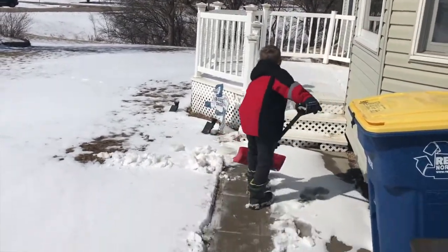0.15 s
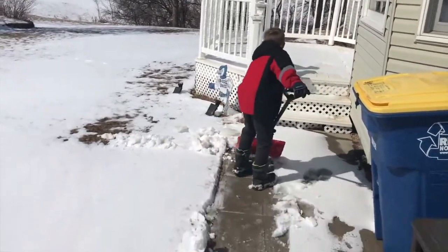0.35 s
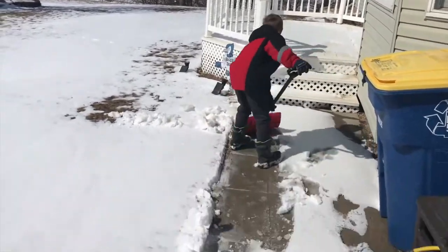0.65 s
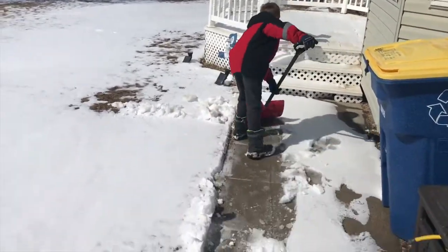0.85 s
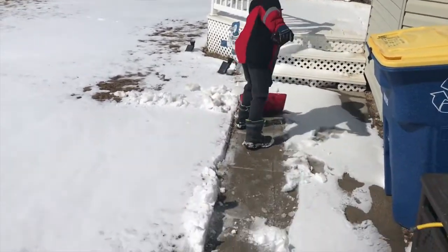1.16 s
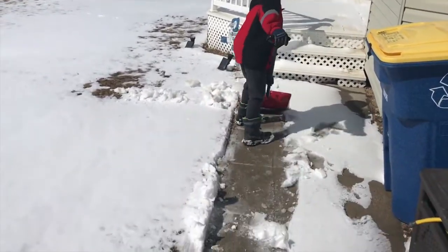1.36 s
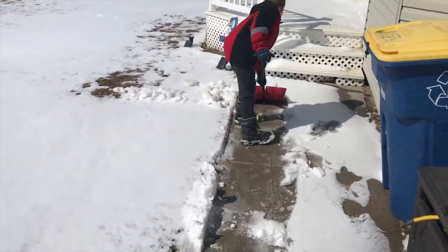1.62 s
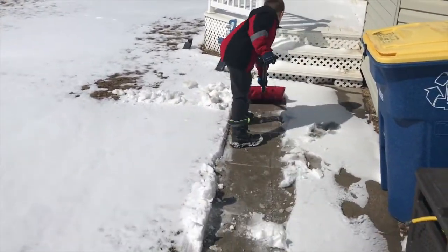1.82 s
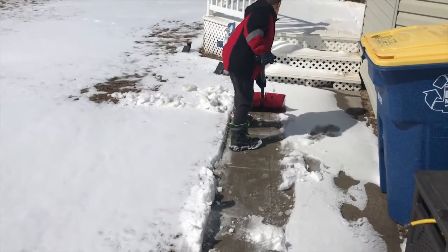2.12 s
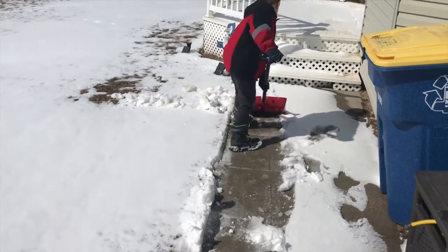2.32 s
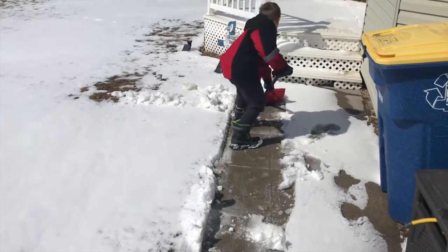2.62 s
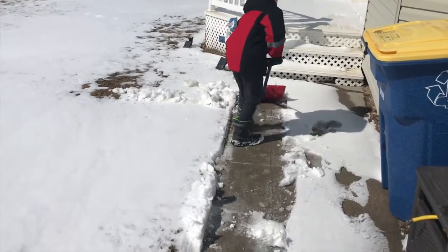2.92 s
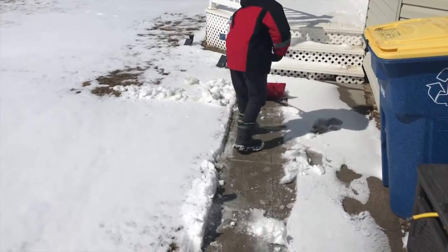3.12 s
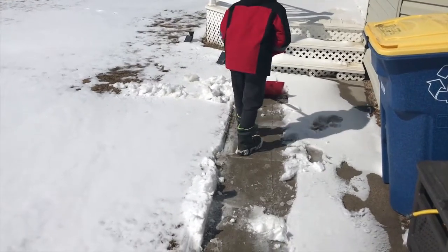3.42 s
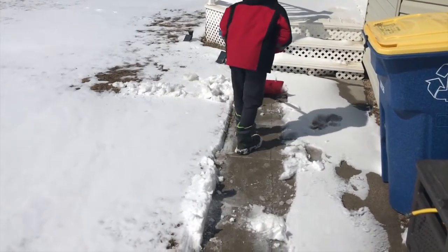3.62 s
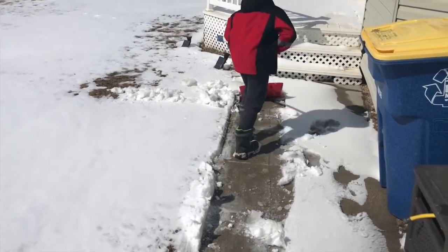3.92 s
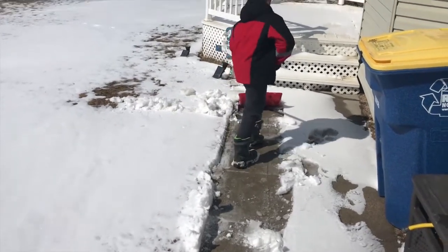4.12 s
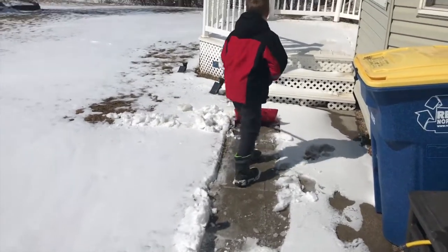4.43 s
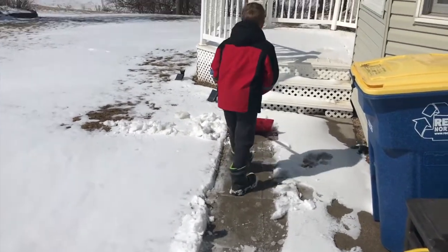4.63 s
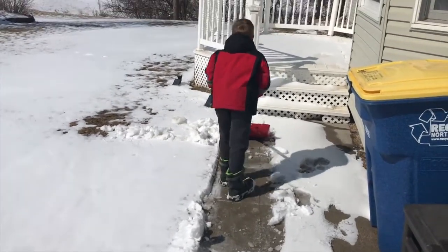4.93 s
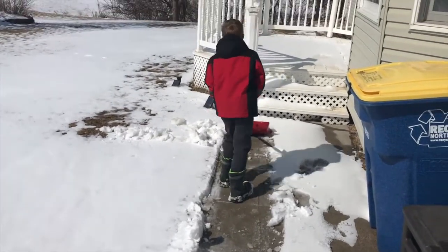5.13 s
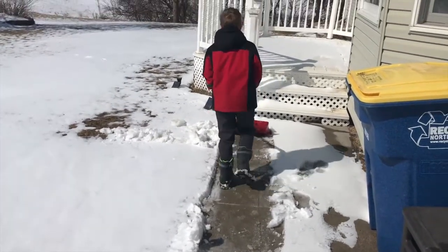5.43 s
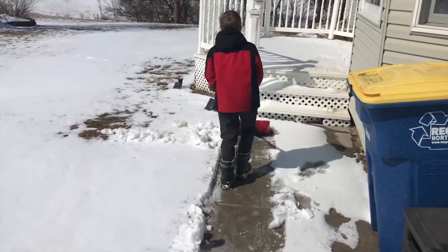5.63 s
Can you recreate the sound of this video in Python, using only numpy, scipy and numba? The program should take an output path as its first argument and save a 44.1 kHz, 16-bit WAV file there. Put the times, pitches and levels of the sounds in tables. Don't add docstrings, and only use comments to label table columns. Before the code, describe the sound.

Gritty, hollow shovel scrapes in bursts over a concrete path, followed by near-quiet with low wind buffeting and a few boot scuffs and clicks.

```python
import sys
import numpy as np
from scipy import signal
from scipy.fft import rfft, irfft
from scipy.io import wavfile
from scipy.ndimage import uniform_filter1d
from numba import njit

SR = 44100
rng = np.random.default_rng(int(sys.argv[2]) if len(sys.argv) > 2 else 0)


def generate_wav(signal):
    frames = np.transpose(np.atleast_2d(signal))
    scaled = np.clip(frames, -1, 1) * 32767
    pcm = np.round(scaled).astype(np.int16)
    wavfile.write(sys.argv[1], SR, pcm)


def gain_from_decibels(decibels):
    exponent = np.asarray(decibels, float) / 20
    return 10 ** exponent


N = 254016

# (frequency [Hz], density [dB per Hz])
GRIT_SPECTRUM = [(1650, -11.5), (2800, 3), (2990, -3), (3500, 1.5), (4100, -5), (4470, -2.5), (4860, -8.5),
                 (5210, -5.5), (6170, -3.5), (7470, -8), (9390, -11), (10300, -16), (13400, -62),
                 (22000, -120)]
# (frequency [Hz], density [dB per Hz])
SPRAY_SPECTRUM = [(6060, -12), (10300, -4), (10800, -6), (12400, -1), (14000, -8), (15800, -7.5)]


def shovel():
    # (time [s], peak [dB], place towards the belly and away from the rim [dB], grit [dB])
    knocks = [(0.526, -30.5, -7, -6), (0.544, -28.5, -4, -7), (0.557, -28.5, 6.5, -8.5),
              (0.608, -34, 11, -1), (0.653, -35, -4, -2), (0.669, -25, -4, -3), (0.704, -24, -6.5, -20),
              (0.780, -45.5, 9, -3.5), (1.114, -39.5, -6, -20), (1.147, -33, 0, -28), (1.163, -32, -5, -18),
              (1.207, -40, 3, 0.5), (1.512, -43, -5, -10), (1.528, -40, -8, -7), (1.559, -34, -6, -9),
              (1.601, -19, 0.5, -1), (1.623, -36, 12, -21), (1.668, -19.5, -4, -10),
              (1.699, -28.5, 8.5, -8), (1.839, -49, 12, -7), (2.114, -35.5, 2, -15), (2.243, -49, 2, -10),
              (2.287, -35, 1, -14), (2.353, -37.5, 2, -1.5), (2.471, -25.5, 8, -22),
              (2.483, -24.5, -9, -18), (2.496, -20.5, 5, -22), (2.519, -28.5, 5, -6),
              (2.549, -26.5, 3.5, -10), (2.579, -35, -8, 7), (2.649, -36, -6, -12)]
    # (frequency [Hz], width [Hz], level [dB])
    belly_modes = [(259.5, 61, -1.5), (347, 55, 4), (412.6, 90, -4)]
    blade_modes = [(560, 73, 3.5), (714, 76, 2.5), (906, 85, 2.5), (995, 70, 3.5), (1144, 30, -0.5)]
    rim_modes = [(1330, 103, 3), (1620, 110, 3), (1880, 160, -1), (2100, 147, 1), (2310, 590, -6.5)]
    # (time [s], level [dB], frequency [Hz], width [Hz])
    chips = [(0.597, -27, 5860, 2500), (0.666, 0, 1140, 200), (0.667, -7, 2150, 300),
             (1.602, -20.5, 4650, 2500), (1.604, -18, 1560, 300), (1.605, -2.5, 960, 200),
             (1.669, -6.5, 696, 200), (1.67, -11, 1030, 200), (2.287, -17, 7000, 1500),
             (2.288, -13, 1030, 129), (2.2865, -7, 1990, 197), (2.287, -5.5, 2980, 200),
             (2.29, -10, 1320, 120), (2.496, -23.5, 6130, 900), (3.6, -54, 6800, 1170),
             (3.6, -51, 10140, 1500), (3.988, -56, 4500, 3000), (4.913, -41, 5500, 1000),
             (5.228, -38, 4500, 900), (0.703, -11, 1150, 300), (0.703, -26.5, 3500, 1500),
             (4.914, -40, 1020, 160), (5.481, -42, 1880, 220), (5.534, -39, 1100, 350)]
    knock_t60_s, knock_boom_db, knock_rim_db = 0.048, -2.5, -5

    blade, belly, rim, grit, spray = pressure()
    lean = gain_from_decibels(0.6 * walk(30))
    forces = [belly * gain_from_decibels(-3.0) * slips(1200, 2.9, 0.87, 45.37),
              blade * gain_from_decibels(-5.5) * lean * slips(2500, 3.2, 1.1, 70),
              rim * gain_from_decibels(-7.0) / lean * slips(4000, 2.5, 1.3, 70),
              grit * gain_from_decibels(-1.1) * slips(4000, 3.5, 1.8, 90),
              spray * gain_from_decibels(-0.9) * slips(10000, 2.7, 1.7, 80)]

    for s, db, place_db, grit_db in knocks:
        parts = [(knock_boom_db + place_db, 0.5, 0.9),
                 (-1.5, 0.5, 0.8),
                 (knock_rim_db - place_db, 0.45, 0.6),
                 (grit_db - 2.5, 0.7, 0.15),
                 (grit_db - 5.5, 0.6, 0.1)]
        for force, (part_db, share, blow) in zip(forces, parts):
            strike(force, s, gain_from_decibels(db + part_db), t60=share * knock_t60_s, rise=0.0012, blow=blow)

    bodies = [ring(force, modes) for force, modes in zip(forces, (belly_modes, blade_modes, rim_modes))]
    out = sum(bodies) + colour(forces[3], GRIT_SPECTRUM) + colour(forces[4], SPRAY_SPECTRUM)

    for s, db, hz, width in chips:
        chip = np.zeros(SR // 10)
        strike(chip, 0.01, gain_from_decibels(db + 6), t60=0.01, rise=0.0006, blow=0.8)
        start = int((s - 0.01) * SR)
        out[start:start + len(chip)] += band_pass(band_pass(chip, hz, width), hz, 3 * width)
    return out


def pressure():
    # (time [s], level [dB])
    shoves = [
        [(0.518, -51), (0.524, -33), (0.562, -25), (0.58, -29.5), (0.592, -27.5), (0.614, -30), (0.638, -31)],
        [(0.645, -29), (0.671, -25), (0.685, -26), (0.697, -28.5), (0.712, -30), (0.735, -53.5), (0.765, -71),
         (0.79, -52)],
        [(1.08, -52), (1.106, -51), (1.124, -42.5), (1.134, -47.5), (1.166, -31.5), (1.204, -37.5),
         (1.208, -36), (1.24, -44)],
        [(1.247, -47.5), (1.277, -45), (1.313, -42), (1.359, -50), (1.377, -43), (1.407, -51.5), (1.433, -48.5),
         (1.47, -69)],
        [(1.49, -65), (1.512, -46.5), (1.55, -39), (1.558, -31.5), (1.594, -30), (1.612, -24), (1.64, -29),
         (1.648, -40)],
        [(1.655, -34), (1.666, -23), (1.672, -23), (1.689, -30), (1.71, -28.5), (1.73, -31), (1.783, -39.5),
         (1.8, -70)],
        [(2.04, -71), (2.06, -54), (2.076, -54), (2.102, -43), (2.116, -42.5), (2.144, -47.5), (2.19, -44.5),
         (2.214, -55), (2.225, -50)],
        [(2.232, -51), (2.249, -40), (2.278, -49), (2.29, -26.5), (2.32, -42.5), (2.344, -46), (2.356, -43.5),
         (2.4, -57)],
        [(2.45, -40), (2.463, -44), (2.471, -28), (2.495, -21), (2.511, -33), (2.533, -31.5)],
        [(2.54, -35), (2.552, -28), (2.568, -33.5), (2.59, -32.5), (2.604, -39.5), (2.64, -45), (2.65, -40),
         (2.676, -42.5), (2.71, -63.5)],
    ]
    # (boom [dB], rim [dB], grit [dB], spray [dB])
    grips = [(-4, 1.5, -11, -18.5), (-1.5, 0.5, -8, -17), (-2.5, -2, -14, -17.5), (-8, -5, -12, -23),
             (-5.5, 2.5, -8, -14), (-7, 0.8, -7.5, -12), (-7, -0.5, -8.5, -10.5), (-7.5, 2.5, -10, -13.5),
             (-12, 2, -10, -14.5), (-9, -2, -6.5, -10.5)]
    # (boom [dB], rim [dB], grit [dB], spray [dB])
    lightness = (0.018, 0.011, 0.18, 0.27)
    firm_db = -35

    t, drives = np.arange(N) / SR, 0
    for rows, grip in zip(shoves, grips):
        s, db = np.transpose(rows)
        fade = np.clip(np.minimum(t - s[0] + 0.011, s[-1] + 0.012 - t) / 0.013, 0, 1)
        press_db = np.interp(t, s, db)
        above = [part_db + gain * (firm_db - press_db) for part_db, gain in zip(grip, lightness)]
        drives = drives + fade * np.array([gain_from_decibels(press_db + part_db) for part_db in [0, *above]])
    return drives


def slips(rate, spread_db, chatter_db, chatter_rate):
    caught = rng.random(N) < rate / SR
    size = gain_from_decibels(spread_db * np.minimum(rng.exponential(size=N), 4.5))
    force = caught * size * np.sign(noise())
    return unit(force * gain_from_decibels(chatter_db * walk(chatter_rate)))


def catches():
    # (time [s], peak [dB], frequency [Hz], decay by 60 dB [s])
    pings = [(0.524, -28.5, 282, .08), (0.556, -23, 666, 0.076), (0.611, -26, 352, 0.18),
             (0.666, -19.5, 1100, .04), (0.668, -25, 1330, .04), (0.669, -28, 304, 0.12),
             (0.703, -23, 275, 0.072), (0.782, -39.5, 340, 0.12), (0.84, -44.5, 347, 0.11),
             (0.917, -42, 2320, .03), (1.006, -46, 1000, .05), (1.121, -35.5, 295, .1),
             (1.149, -33, 990, .04), (1.161, -30, 322, 0.11), (1.174, -32, 1000, .04),
             (1.174, -33, 397, 0.052), (1.208, -28.5, 630, .03), (1.559, -24.5, 1665, 0.034),
             (1.602, -17, 258, 0.066), (1.604, -31, 182, 0.11), (1.603, -17.5, 714, 0.058),
             (1.607, -21, 1094, 0.057), (1.617, -23, 1500, 0.027), (1.668, -17, 340, 0.11),
             (1.668, -25, 930, .04), (1.675, -35, 627, .06), (2.115, -36.5, 972, 0.081),
             (2.2871, -17, 1024, 0.034), (2.2905, -27, 1160, 0.023), (2.25, -45, 1000, .05),
             (2.354, -36, 990, 0.043), (2.469, -24, 377, .07), (2.495, -17.5, 302, 0.11),
             (2.649, -42, 940, 0.034), (2.954, -41, 1270, .02), (4.9123, -39, 1500, 0.011),
             (4.9124, -40, 2770, 0.011), (4.9127, -45, 4200, .008), (4.913, -34.5, 1010, 0.024),
             (5.132, -32, 1960, 0.022), (5.18, -32, 1770, .015), (5.2238, -29, 1870, .02),
             (5.2233, -31.5, 3520, .012), (5.224, -34, 950, .025), (5.533, -51, 1200, .015),
             (0.81, -58, 13000, .01), (1.174, -48, 12500, .012), (1.175, -52, 5940, .015),
             (1.205, -46, 7360, .015), (4.551, -62, 12500, .008)]
    rise_turns = 0.3

    out, t = np.zeros(N + SR), np.arange(SR // 4) / SR
    for s, db, hz, t60 in pings:
        rise = np.minimum(t * hz / rise_turns, 1)
        decay = 1000. ** (-t / max(t60, 0.005))
        start = int(s * SR)
        out[start:start + len(t)] += gain_from_decibels(db) * rise * decay * np.sin(2 * np.pi * hz * t)
    return out[:N]


def boots():
    # (time [s], peak [dB], frequency [Hz], grit
    # [dB])
    snaps = [(0.065, -48, 2190, -10), (0.298, -47, 1820, -0.5), (1.808, -54, 1820, -30),
             (2.954, -43, 1260, -8), (3.213, -45, 1880, -13), (2.114, -21, 624, -39),
             (4.913, -50, 1050, -10), (5.08, -42, 1830, -20), (5.12, -39, 620, -25),
             (5.133, -41, 1850, -22), (5.18, -34, 1820, -9), (5.227, -36, 1850, -1),
             (5.341, -44, 1750, -22), (5.481, -52.5, 1840, -9), (5.697, -40, 1280, -5)]
    # (frequency [Hz], width [Hz], level [dB])
    sole_modes = [(950, 200, 5), (1446, 380, 4), (1820, 280, 5.5), (2540, 1600, -7)]
    heel_modes = [(360, 180, -4), (694, 160, -0.5)]
    snap_t60_s = 0.039

    crunch, heel, grit, spray = tread()
    sole = ring(crunch * gain_from_decibels(-0.6) * slips(4000, 2.3, 1.1, 50), sole_modes)
    sole += ring(heel * slips(2000, 1.1, 2.2, 40), heel_modes)
    grit = grit * gain_from_decibels(-0.6) * slips(7000, 2.9, 1.5, 60)
    spray = spray * gain_from_decibels(-0.6) * slips(14000, 2.2, 1.2, 60)

    for s, db, hz, grit_db in snaps:
        crack, start = np.zeros(SR // 5), int((s - 0.01) * SR)
        strike(crack, 0.01, gain_from_decibels(db), t60=snap_t60_s, rise=0.001, blow=0.45)
        crack = crack[:N - start]
        spot = slice(start, start + len(crack))
        sole[spot] += gain_from_decibels(9.0) * band_pass(band_pass(crack, hz, 0.22 * hz), hz, 1.4 * hz)
        sole[spot] += gain_from_decibels(grit_db - 2) * band_pass(crack, 1800., 2200.)
        grit[spot] += gain_from_decibels(grit_db - 3.5) * crack
        spray[spot] += gain_from_decibels(grit_db - 5) * crack
    return sole + colour(grit, GRIT_SPECTRUM) + colour(spray, SPRAY_SPECTRUM)


def tread():
    # (peak time [s], crunch [dB], rise [s], fall [s], dryness [dB])
    scuffs = [(0.013, -50.5, 0.027, 0.035, 1), (1.012, -50.5, 0.054, 0.097, -3.5),
              (1.818, -56.5, 0.027, 0.099, -4), (3.065, -52, 0.043, 0.13, -5), (3.3, -59, .08, 0.27, -3.5),
              (3.918, -46, 0.18, 0.068, -5), (4.03, -51.5, 0.046, 0.036, -5.5),
              (4.49, -56, 0.024, 0.12, -5.5), (4.562, -51.5, 0.047, 0.1, -2.3), (4.68, -64, 0.15, 0.35, -3),
              (5.085, -48, 0.023, 0.099, -4), (5.11, -43.5, 0.024, 0.1, -12.5), (5.4, -64, 0.067, 0.23, -9),
              (0.087, -55, .05, 0.061, -3.5), (0.295, -58, 0.0044, 0.095, 5.5),
                (0.54, -69, 0.18, 0.045, -4), (1.106, -53, 0.072, 0.036, -11), (1.872, -57, 0.32, 0.13, 6),
                (2.05, -58, 0.52, 0.053, -1), (0.81, -60, 0.0085, 0.12, -5), (0.885, -60, 0.062, .1, 5.5),
                (3.11, -70.5, .2, 0.13, 7), (4.075, -68, 0.11, 0.018, 6), (3.9, -52, 0.023, 0.068, 1),
                (2.975, -58, 0.12, 0.11, -1), (3.505, -63, 0.22, 0.071, -1.5), (3.68, -77, 0.4, 0.12, -10),
                (4.25, -76, 0.15, 0.28, -8), (3.8, -54.5, 0.066, 0.26, -3), (0.415, -63, 0.018, 0.066, 2),
                (5.3, -63, 0.037, 0.034, -6), (5.04, -53, 0.12, 0.13, -6.5)]
    # (time [s], length [s], first level [dB], last level [dB], dryness [dB])
    slides = [(0.9, 0.092, -56, -61, 8), (2.70, 0.198, -62, -57.5, -3.5), (3.034, 0.015, -49, -45, -0.5),
              (3.213, 0.065, -54, -58.5, 6), (4.118, 0.041, -53, -46.5, 1), (4.338, 0.12, -61, -52, 0.5),
              (4.858, 0.12, -63.5, -59.5, 4.5), (5.121, 0.12, -40.5, -40.5, -3.5),
              (5.245, 0.059, -44.5, -46, -5.5), (5.311, 0.039, -50.5, -53, -7),
              (5.646, 0.031, -59, -52, -4), (5.682, 0.099, -45, -43.5, -5)]
    # (peak time [s], level [dB], rise [s], fall [s])
    sifts = [
        (0.85, -60, 0.11, 0.5),
        (1.3, -51.5, 0.21, 0.14),
        (1.78, -51.5, 0.18, 0.29),
        (2.95, -59.5, 0.49, 0.9),
        (3.17, -58, 0.12, 0.12),
        (5.2, -48.5, 0.16, 0.16),
    ]
    touch_s, lift_s = 0.0046, 0.023
    light_db = -55
    heel_db, heel_per_dry, heel_per_load = -9, -0.8, 0.13
    spray_db, spray_per_dry = -6, 0.93

    flat = [(*row[:-1], touch_s, lift_s, row[-1]) for row in slides]
    events = peaked(scuffs) + flat
    s, length, first_db, last_db, rise, fall, dry_db = np.transpose(events)
    heel_above = heel_db + heel_per_dry * dry_db + heel_per_load * (first_db - light_db)
    spray_above = spray_db + spray_per_dry * dry_db
    crunch, heel, grit, spray = [swells(zip(s, length, first_db + up, last_db + up, rise, fall))
                                 for up in (0, heel_above, dry_db, spray_above)]
    return crunch, heel, grit, np.hypot(spray, swells(peaked(sifts)))


def creaks():
    # (time [s], length [s], level [dB], frequency [Hz])
    squeaks = [(0.299, 0.015, -55, 2020), (0.296, 0.01, -61, 3200), (0.897, 0.033, -54, 2460),
               (0.904, .03, -56, 3400), (0.923, .07, -60, 4700), (0.959, 0.042, -54.5, 1750),
               (1.205, .03, -55, 3300), (1.801, 0.038, -51, 1800), (3.326, 0.017, -62.5, 3400),
               (3.465, 0.05, -64, 3370), (3.698, 0.11, -72, 3380), (4.115, 0.018, -57, 1600),
               (4.126, 0.025, -57, 960), (4.141, 0.02, -51, 1810), (4.941, 0.038, -60, 1770),
               (4.937, 0.034, -66, 3300), (5.03, 0.041, -55.5, 1000), (5.078, 0.027, -54, 1840),
               (5.141, 0.14, -52, 2340), (5.249, 0.066, -52, 1840), (5.336, 0.012, -50, 1900),
               (5.476, 0.011, -55.5, 1900), (5.646, .03, -53, 500), (5.69, .04, -56, 3340),
               (0.062, .008, -53.5, 3800), (0.063, .008, -51, 2100), (2.775, .012, -60, 6500),
               (2.775, 0.011, -64, 12500), (2.9, 0.11, -63.5, 12300), (3.035, 0.018, -58, 5500),
               (4.03, .05, -68, 13000), (4.115, 0.049, -57, 5170), (4.86, .04, -64, 14000),
               (0.635, .03, -37, 1120), (3.311, .008, -56, 2000), (0.377, .004, -60, 3300),
               (0.808, .004, -59, 5500), (4.548, 0.054, -59.5, 2780), (5.307, .045, -65, 2500)]
    share, edge_s, grain_db = 0.18, 0.0054, 3.5

    out, t = np.zeros(N + SR), np.arange(SR // 4) / SR
    for s, length, db, hz in squeaks:
        chance = rng.standard_normal((2, len(t)))
        grains = chance[0] * gain_from_decibels(grain_db * chance[1])
        band = unit(band_pass(band_pass(grains, hz, share * hz), hz, 2 * share * hz))
        fade = np.clip(np.minimum(t, length + edge_s - t) / edge_s, 0, 1)
        start = int(s * SR)
        out[start:start + len(t)] += gain_from_decibels(db) * band * fade
    return out[:N]


def wind():
    # (peak time [s], level [dB], rise [s], fall [s])
    gusts = [(0.4, -73, 1.5, 0.6), (1.14, -51.5, 0.2, 0.13), (1.44, -47.5, 0.12, 0.043),
             (1.6, -50, 0.045, 0.17), (1.92, -73, 0.26, .15), (2.09, -48.5, 0.055, 0.036),
             (2.164, -34.5, 0.015, 0.021), (2.254, -37.5, 0.027, 0.04), (2.388, -52, 0.099, 0.034),
             (2.494, -55, .058, .5), (2.722, -35.5, 0.064, 0.035), (2.87, -44.5, 0.038, 0.044),
             (2.958, -28.5, 0.027, 0.032), (3.1, -39.5, 0.19, 0.082), (3.195, -27, 0.089, 0.076),
             (3.306, -43, 0.18, 0.14), (3.458, -37.5, 0.042, 0.031), (3.528, -33, 0.015, 0.024),
             (3.65, -54, 0.28, 0.17), (4.0, -56, 0.49, 0.68), (4.25, -50.5, 0.14, 0.083),
             (4.36, -52, 0.13, 0.14), (4.55, -60.5, 0.13, 1), (5.18, -62, .15, 1.1),
             (5.52, -58, 0.12, 0.11), (5.76, -64, 0.26, .2)]
    calm_db, flutter_db, flutter_power = -74, -37, 0.49

    gust = swells(peaked(gusts)) + gain_from_decibels(calm_db)
    thump = gust * eddies(59.5, 44.6, 0.26)
    flutter = gust ** flutter_power * gain_from_decibels(flutter_db) * eddies(143.0, 55.0, 0.41)
    return thump + flutter


def eddies(hz, width, evenness):
    x = band_pass(noise(), hz, width)
    x = band_pass(band_pass(x, hz, 1.5 * width), hz, 2.0 * width)
    envelope = uniform_filter1d(np.abs(signal.hilbert(x)), int(SR / hz))
    return unit(x / (envelope + 0.15 * envelope.mean()) ** np.clip(evenness, 0, 1))


def air():
    # (frequency [Hz], density [dB per Hz])
    air_spectrum = [(53, -23), (90, 0.5), (296, -4), (581, -5), (1470, -18), (1830, -18.5), (2590, -25),
                    (3360, -23), (4960, -25.5), (7020, -27.5), (10600, -30), (12600, -29.5), (16000, -30)]
    # (time [s], level [dB])
    traffic = [
        (0, 4.5),
        (1.0, 2.5),
        (2.0, -0.5),
        (3.0, 1.5),
        (3.7, 2.6),
        (4.3, 0.5),
        (4.8, 0),
        (5.76, -1),
    ]
    air_db = -60.5

    swell_db = np.interp(np.arange(N) / SR, *np.transpose(traffic))
    flicker_db = 0.7 * walk(10)
    return gain_from_decibels(air_db + swell_db + flicker_db) * colour(noise(), air_spectrum)


def strike(target, s, gain, t60, rise, blow):
    t = np.arange(int(SR * 0.15)) / SR
    shape = gain * np.minimum(t / rise, 1) * 1000. ** (-t / max(t60, 0.004))
    hit = shape * rng.standard_normal(len(t))
    hit[int(rise * SR)] = blow * np.sqrt(np.sum(shape ** 2))
    start = max(int((s - rise) * SR), 0)
    target[start:start + len(t)] += hit[:len(target) - start]


def peaked(rows):
    return [(s, 0, db, db, *rest) for s, db, *rest in rows]


def swells(rows):
    t, power = np.arange(N) / SR, 0
    for s, length, first_db, last_db, rise, fall in rows:
        before, after = (s - t) / max(rise, 0.003), (t - s - length) / max(fall, 0.003)
        edge = np.maximum(0, np.maximum(before, after))
        level_db = np.interp(t, [s, s + length + 1 / SR], [first_db, last_db])
        power = power + gain_from_decibels(level_db - 20 * edge) ** 2
    return np.sqrt(power)


def patchy(x, patchy_db, rate):
    out = x
    for hz in 700 * 2 ** np.arange(0, 4.5, 0.5):
        gain = gain_from_decibels(patchy_db * walk(rate) - patchy_db ** 2 / 9)
        out = out + (gain - 1) * band_pass(x, hz, hz / 3)
    return out


def unit(x):
    return x / np.sqrt(np.mean(x ** 2))


def noise():
    return rng.standard_normal(N)


def walk(rate):
    k = int(SR / rate)
    held = np.repeat(rng.standard_normal(N // k + 1), k)
    return unit(uniform_filter1d(uniform_filter1d(held, k), k)[:N])


@njit
def band_pass(x, hz, width):
    y, b, l = np.empty(len(x)), 0., 0.
    g, k = np.tan(np.pi * hz / SR), width / hz
    for i in range(len(x)):
        v = (b + g * (x[i] - l)) / (1 + g * (g + k))
        b, l, y[i] = 2 * v - b, l + 2 * g * v, k * v
    return y


def ring(x, modes):
    def body(v):
        return sum((-1) ** k * gain_from_decibels(db) * band_pass(v, hz, width) for k, (hz, width, db) in enumerate(modes))

    click = np.zeros(4096)
    click[0] = 1
    return body(x + 1e-18) / np.sqrt(np.sum(body(click) ** 2))


def colour(x, points):
    hz, db = np.transpose(points)
    bins_hz = np.arange(1, 514) * SR / 1024
    cepstrum = irfft(np.interp(np.log(bins_hz), np.log(hz), db) * np.log(10) / 20)
    cepstrum[1:512] *= 2
    cepstrum[513:] = 0
    response = irfft(np.exp(rfft(cepstrum)))[:512]
    return signal.fftconvolve(x, response / np.sqrt(np.sum(response ** 2)))[:len(x)]


def scene():
    near = patchy(shovel() + boots(), patchy_db=1.6, rate=30)
    near = near - 0.65 * band_pass(near, 2700., 320.)
    near = near + catches() + creaks()

    drift = 0
    for hz in (5500., 7500., 9500., 12300., 14500.):
        drift = drift + (gain_from_decibels(2.0 * walk(16) - 0.45) - 1) * band_pass(near, hz, hz / 5)
    near = near + drift

    t = np.arange(int(0.12 * SR)) / SR
    wall = rng.standard_normal(len(t)) * 1000. ** (-t / 0.12) * (t > 0.004)
    echo = signal.fftconvolve(near, wall / np.sqrt(np.sum(wall ** 2)))[:N]
    return (near + gain_from_decibels(-13) * echo + wind() + air())[None]


def top_cut(x):
    return signal.sosfilt(signal.butter(12, 17000, fs=SR, output="sos"), x)


def record(dry):
    dulled = dry - 0.46 * band_pass(dry[0], 10330., 830.)
    low_pass = signal.ellip(10, 0.2, 80, 15580, fs=SR, output="sos")
    mix = signal.sosfilt(low_pass, dulled)
    return top_cut(mix)


dry = scene()
out = record(dry)
generate_wav(out)
```